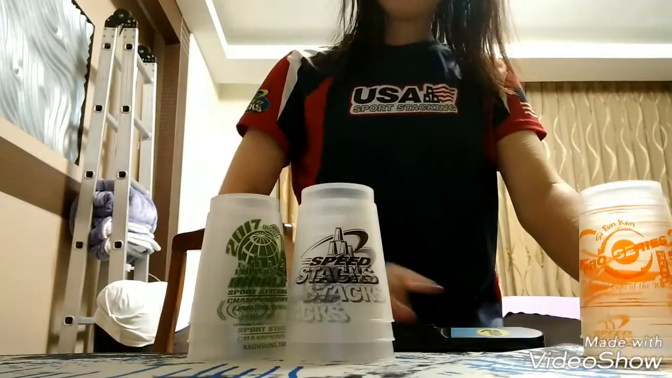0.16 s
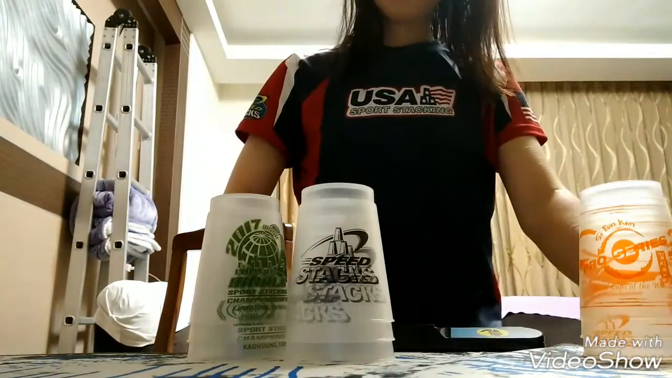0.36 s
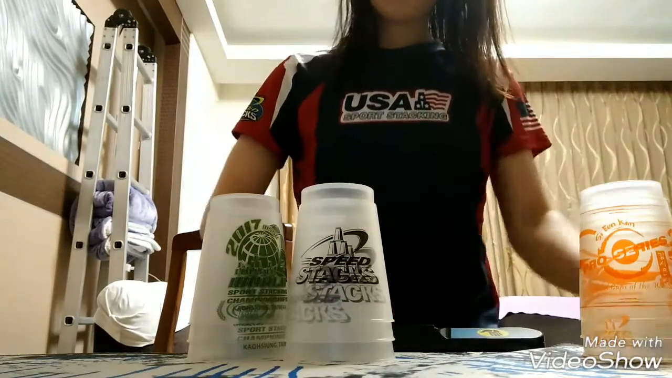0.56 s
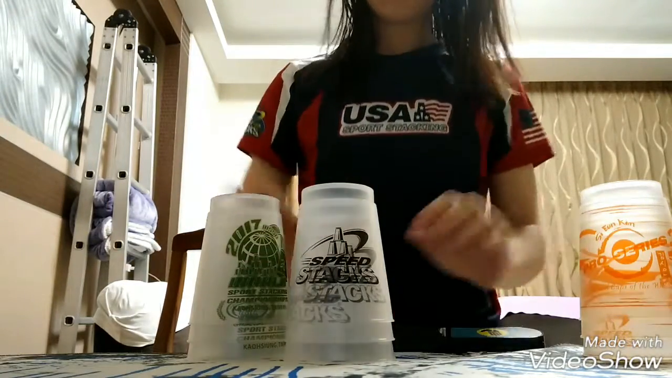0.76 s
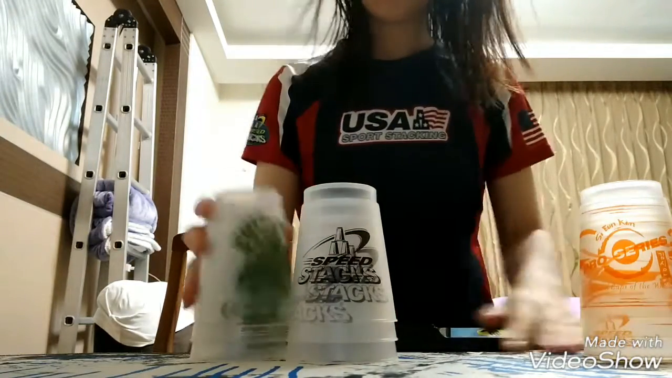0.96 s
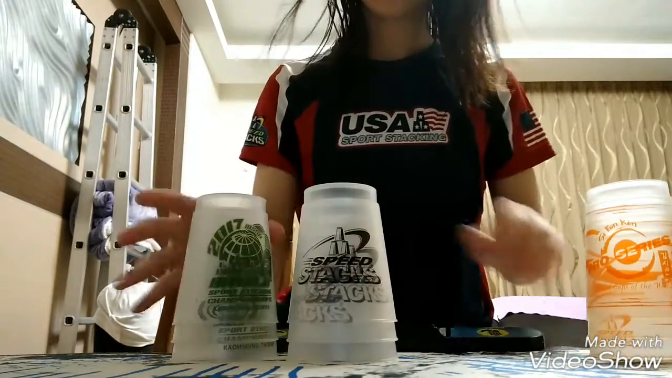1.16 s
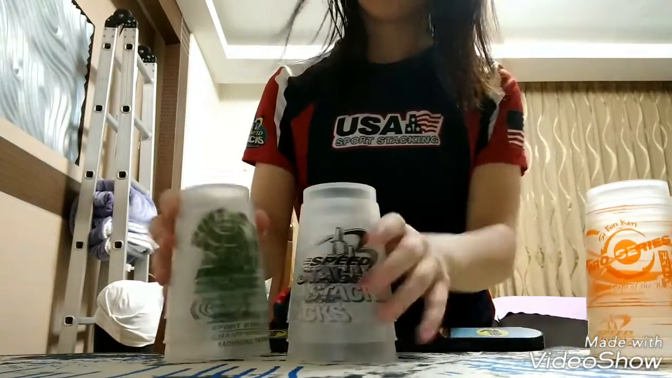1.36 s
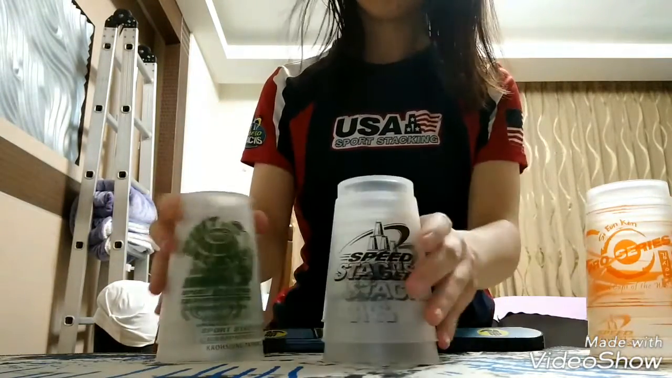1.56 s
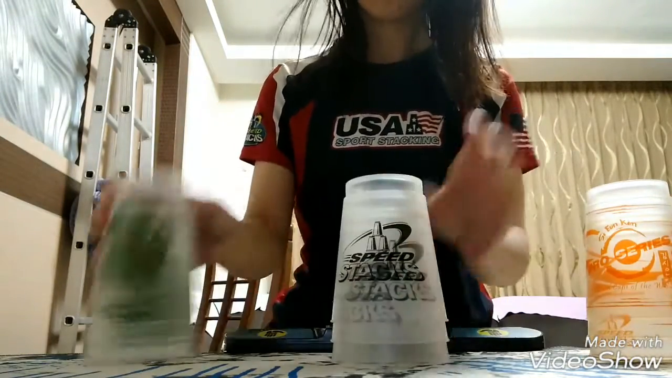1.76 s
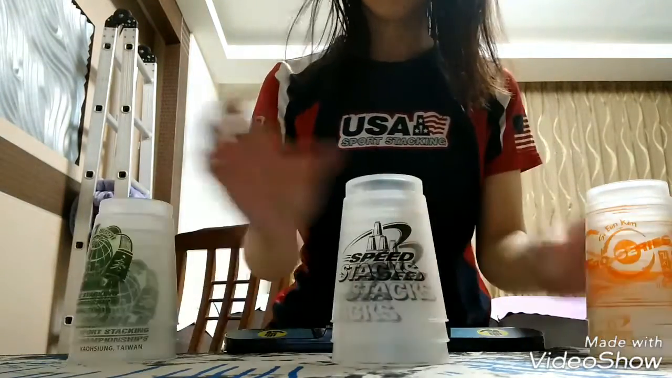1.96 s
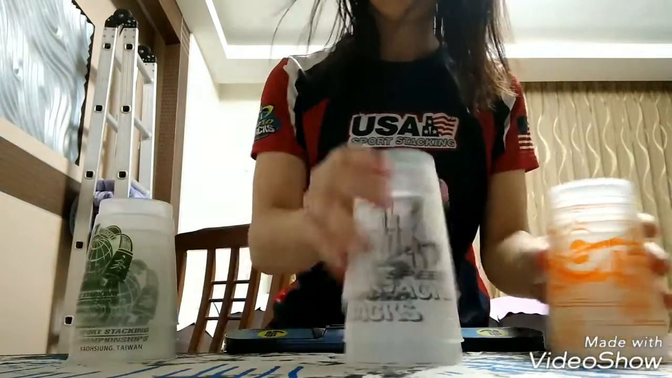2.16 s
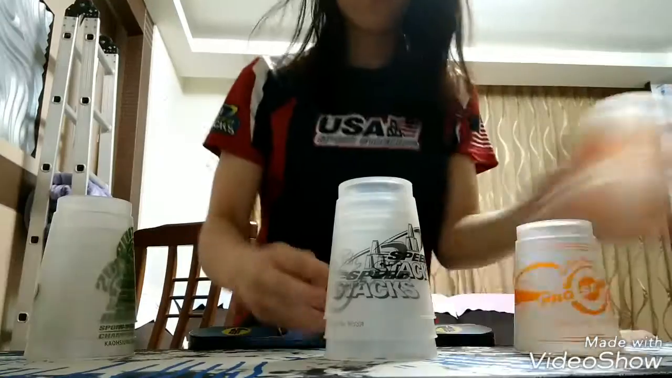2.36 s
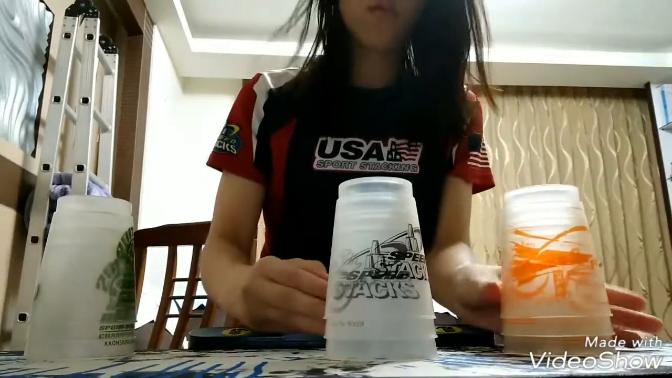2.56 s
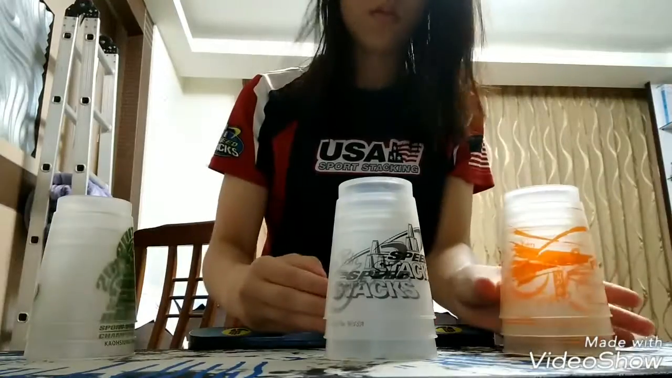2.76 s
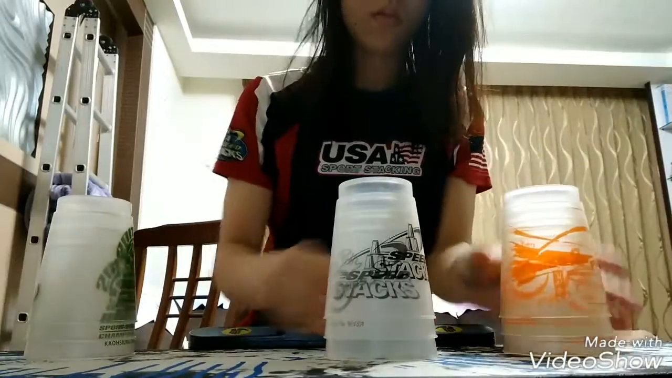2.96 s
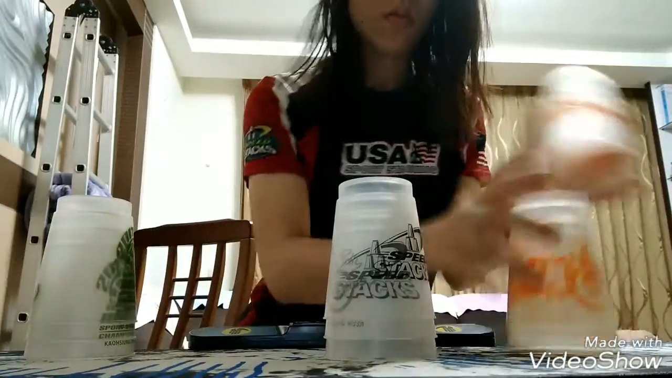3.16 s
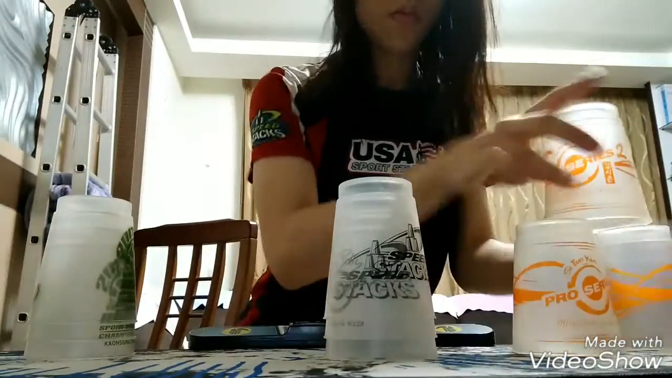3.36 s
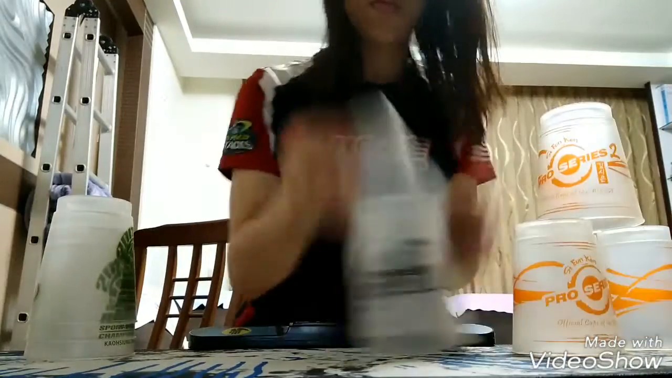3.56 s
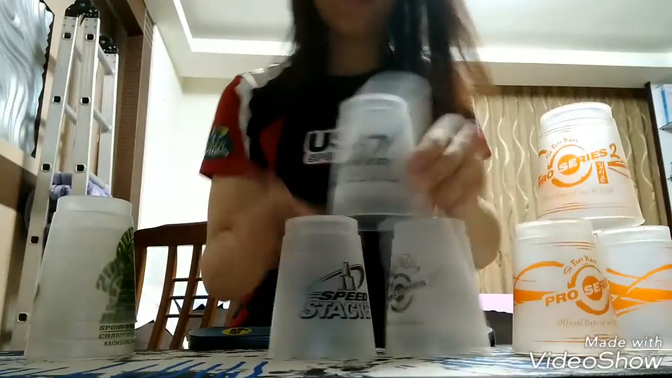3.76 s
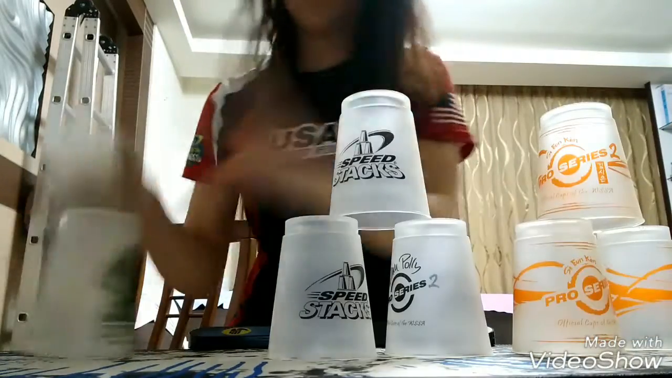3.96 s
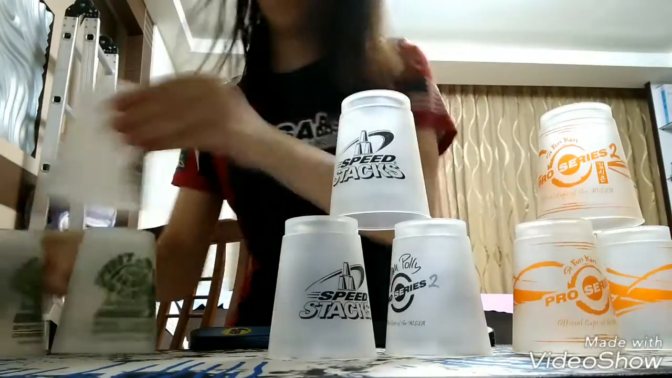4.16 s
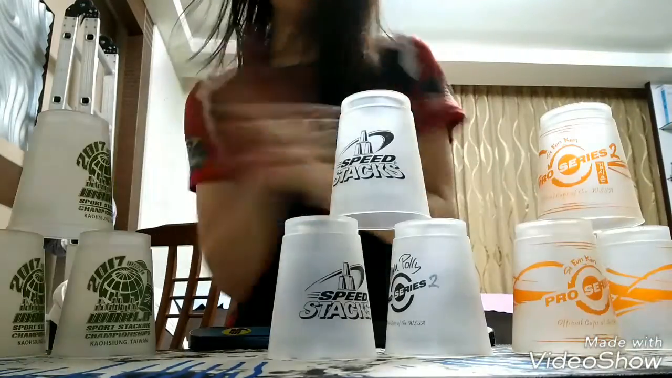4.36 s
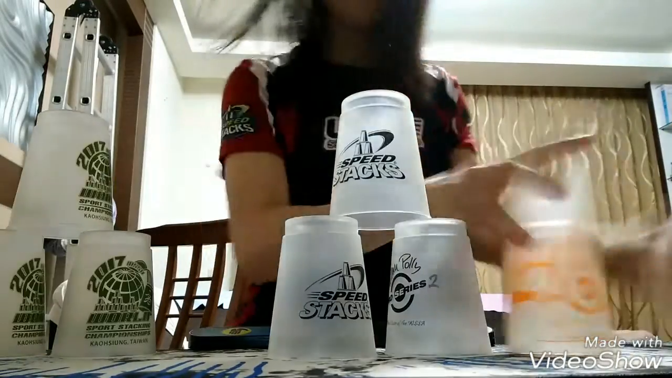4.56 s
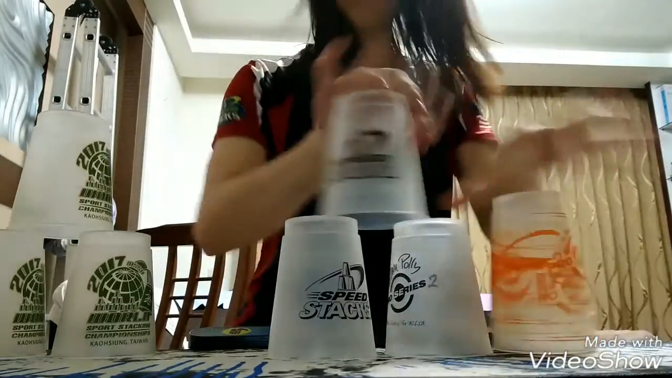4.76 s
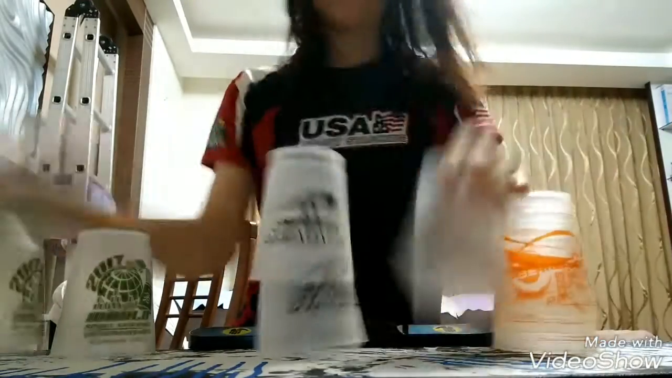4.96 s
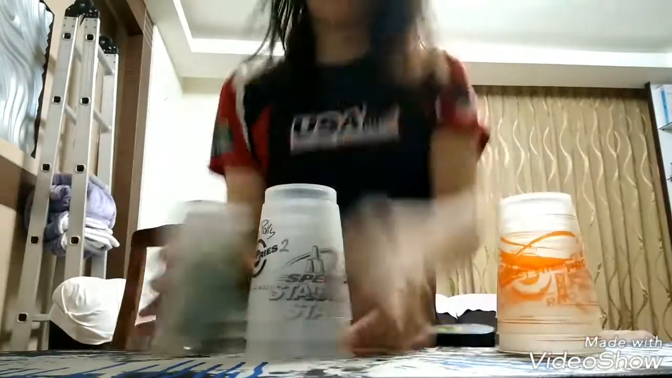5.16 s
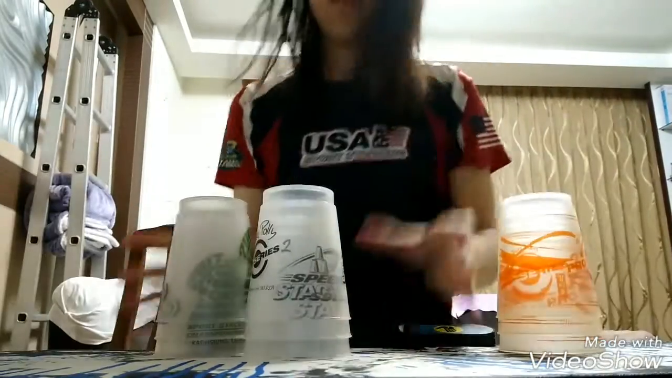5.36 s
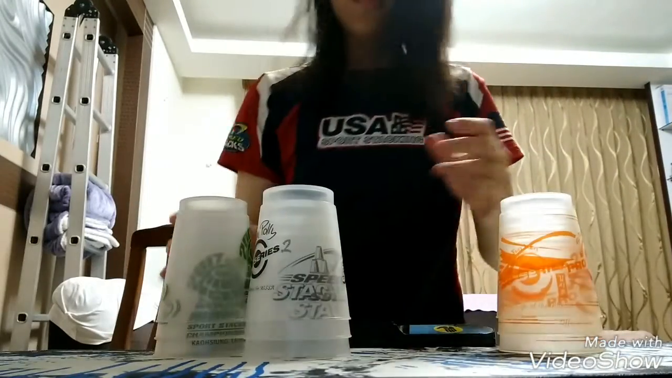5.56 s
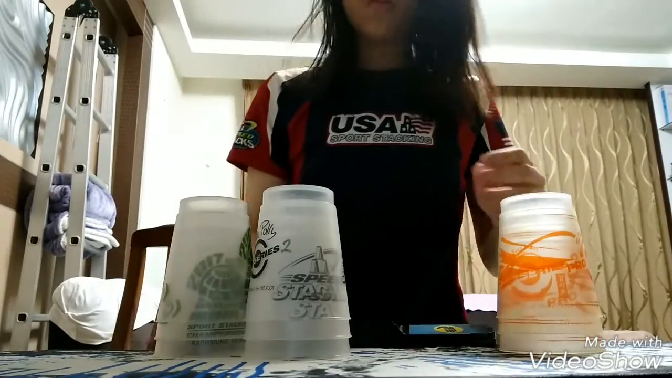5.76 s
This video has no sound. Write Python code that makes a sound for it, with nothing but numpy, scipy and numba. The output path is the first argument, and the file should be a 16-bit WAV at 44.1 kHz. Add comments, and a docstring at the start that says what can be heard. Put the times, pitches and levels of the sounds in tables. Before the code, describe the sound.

In a bare, lively room, plastic cups are handled close to a phone microphone. Faint slides and small knocks open the clip, followed by near quiet until about 0.8 s. From 1.1 to 2.2 s stacks land on a mat with soft hollow thumps, the hardest at 1.95 s. The sound drops out very briefly around 2.3 s, then a tight cluster of cup clacks and scrapes bursts out until 2.6 s. After a lull with light taps, hollow clatter returns at 3.5 s and 3.9 s, with sharp knocks around 4.4 and 4.75 s and scraping slides. The last strong clacks fall at 5.15 and 5.3 s, with thuds through the table and a short echo. Low puffs of moving air rumble mostly left over steady room noise. A faint low hum appears around 5.35 s and fades unevenly; everything sinks away before 5.9 s.

```python
"""Plastic cups are shifted, stacked into pyramids and nested again on a mat, close to a phone in a bare room.
Knocks ring cup air, walls and rim as decaying tones and filtered noise, and thud the table;
slides are stick-slip clicks through resonances. Filtered clicks and low bursts make a draught, mostly at
the left port. Noise-band echo and steady floor noise lie behind; a low tone of about 100 Hz enters late
and fades unevenly. The sound drops out once and sinks away at the end."""
import sys
import numpy as np
from scipy import signal
from scipy.fft import rfft, irfft, next_fast_len
from scipy.io import wavfile
from scipy.ndimage import uniform_filter1d, minimum_filter1d
from numba import njit

SR = 44100
rng = np.random.default_rng(int(sys.argv[2]) if len(sys.argv) > 2 else 0)


def generate_wav(signal):
    """Clip the signal to [-1, 1] and save it as 16-bit WAV at the path in sys.argv[1]."""
    frames = np.transpose(np.atleast_2d(signal))
    scaled = np.clip(frames, -1, 1) * 32767
    pcm = np.round(scaled).astype(np.int16)
    wavfile.write(sys.argv[1], SR, pcm)


def nominal_scale(level):
    """Amplitude ratio for a level in decibels (scalar or array-like)."""
    x = np.asarray(level, float) / 20
    return 10 ** x


N = 260190
T = np.arange(N) / SR
F = np.fft.rfftfreq(2 * next_fast_len(N // 2 + SR // 2, real=True), 1 / SR)

# steady room noise: (frequency [Hz], relative density [dB])
FLOOR = [(120, -34.5), (200, -16.5), (231, 5.5), (333, -6), (465, -0.5), (563, -3), (1270, -9), (1510, -13),
         (3570, -22), (9000, -79.5), (11700, -63), (19800, -120)]
FLOOR_RMS_DB = -53
# late low tone: (time [s], rms level [dB])
TONE = [(5.34, -26.5), (5.384, -41), (5.46, -34), (5.662, -40.5), (5.72, -64.5)]
TONE_HZ = 99.5
# draught rumble: (time [s], relative level [dB], nominal left minus right [dB])
DRAUGHT = [(0.0, -29.5, 12.5), (0.12, -37.5, 3.5), (0.81, -43.5, -1), (1.22, -25, 13), (1.37, -38, 19.5),
           (1.61, -27, 10.5), (1.93, -32, 8.5), (2.15, -21.5, 9.5), (2.5, -35, 8.5), (2.64, -19, 11.5),
           (3.1, -42, 14), (3.45, -28.5, 13), (3.79, -27.5, 2.5), (4.5, -37.5, 5.5), (4.69, -29, 2.5),
           (5.36, -23, -6.5), (5.4, -38, -2), (5.636, -53, 24), (5.808, -43, 21), (5.9, -55, 15)]
# strongest puffs: (time [s], envelope peak at louder port [dB], frequency [Hz], left minus right [dB])
PUFFS = [(0.947, -17, 109.3, 36), (1.018, -16, 114.8, 40.5), (1.042, -15.5, 83.4, 36),
         (1.152, -20, 87.2, 17), (1.298, -25.5, 121.9, 10.5), (1.359, -19, 105, 25.5),
         (1.493, -15, 95.6, 29), (1.516, -18.5, 94.2, 33), (1.579, -15, 101.6, 23), (1.636, -17, 109.5, 30),
         (1.676, -17.5, 96.5, 20.5), (1.72, -23, 105.8, 22), (1.821, -8, 125.4, 21),
         (1.869, -15, 113.9, 21.5), (2.017, -16.5, 92.5, 34.5), (2.06, -21, 107.5, 34.5),
         (2.39, -23, 107.4, 18.5), (2.466, -17.5, 111.9, 10.5), (2.691, -15, 114.7, 8),
         (2.794, -24.5, 111.2, 15.5), (2.857, -23, 97.6, 40.5), (2.902, -18, 97.9, 23),
         (2.966, -23.5, 103, 24.5), (3.077, -18.5, 95, 38.5), (3.155, -15, 97.7, 38),
         (3.187, -20, 116, 24.5), (3.341, -18, 88.3, 43.5), (3.423, -18, 123.3, 27),
         (3.451, -23, 105.3, 16), (3.671, -18.5, 110.3, 18), (3.801, -19, 53.7, 2),
         (3.864, -23.5, 146.8, 13), (4.223, -19.5, 125.5, 6.5), (4.603, -22.5, 126, 31),
         (4.627, -20.5, 92.9, 39), (4.68, -23, 111.8, 9.5), (4.799, -3.5, 130.9, 7.5),
         (4.831, -15.5, 102.5, 21.5), (4.978, -14.5, 141.3, 4), (5.098, -20.5, 123.3, 21.5),
         (5.132, -8, 128, 23), (5.746, -27, 116.6, 36.5), (5.813, -26, 99, 19), (5.882, -28, 114, 18.5)]
# echo bands: (centre [Hz], late t60 [s], relative level [dB])
ROOM = [(124, 0.19, 0.5), (267, 0.28, -3.5), (460, 0.51, -4.5), (1000, 0.5883, 5), (2133, 0.673, 6.5),
        (3670, 0.489, 2), (8140, 0.238, 5.5), (14200, 0.185, 6.5)]
# echo sends: (set-downs [dB], cup-on-cup knocks [dB], slides [dB])
ECHO_SEND_DB = (-3, -3.5, -2.5)
# off-axis colour of what the walls return: (frequency [Hz], gain [dB])
ECHO_COLOUR = [(1100, 0), (1350, 0.5), (1570, -5.5), (1850, 1), (2300, -1), (2750, 4.5), (3300, -1)]
# port likeness: (frequency [Hz], left-right correlation [-1..1])
ALIKE = [(100, 0.27), (300, 0.944), (650, 0.41), (1400, 0.14), (3000, 0.064), (7000, 0.12)]
# port balance of airborne sound: (frequency [Hz], left minus right [dB])
TILT = [(60, -3.5), (110, 5.5), (200, 2), (380, 0), (700, 2), (1290, 1), (2380, 5), (4400, 4), (8120, -3),
        (15000, -0.5)]
PORT_LAG_S = 0.0001884

# cups sliding: (onset peak [s], relative wall level [dB], time to fade 20 dB [s],
# rim re wall [dB], body re wall [dB])
SLIDES = [(0.0, -42, 0.1544, -19.5, 10.5), (0.078, -40.5, 0.12, -27.5, 10), (0.21, -54.5, 0.06, -40, 4),
          (1.543, -42, 0.0437, -31, 20), (1.578, -42, 0.2361, -21, 10.5), (1.782, -43.5, 0.2468, -28, 7.5),
          (2.104, -38.5, 0.2876, -32, 19.5), (2.2, -44.5, 0.38, -26, 10.5),
          (2.376, -33.5, 0.1081, -16.5, 12.5), (2.408, -18, 0.0788, -9, -9.5), (2.6, -17, 0.0715, -10, 17),
          (2.635, -23, 0.1359, -16, 5), (3.235, -45, 0.1, -8.5, -5), (3.43, -58, 0.4, -5, -15.5),
          (3.51, -28, 0.0261, 13, 23), (3.582, -41, 0.11, -17, 16), (3.7, -45.5, 0.29, -15, 13.5),
          (3.76, -41, 0.04, -12, 3), (3.794, -11, 0.0617, -18, 2.5), (3.906, -20.5, 0.0234, -8.5, 22.5),
          (4.08, -43, 0.16, -21.5, 17.5), (4.136, -33, 0, -20, -5), (4.16, -45.5, 0.46, -8, 7.5),
          (4.312, -38, 0.107, -22, 30), (4.69, -35, 0.19, -12, 10), (4.745, -26, 0.06, -13, -0.5),
          (4.784, -5.5, 0.0439, -21.5, 2), (4.865, -21.5, 0.09, -18.5, 5), (4.94, -7, 0.0089, -19.5, -6.5),
          (4.957, -21, .11, -22, 4.5), (5.15, -15, 0.0953, -8.5, 14.5), (5.185, -21.5, 0.1369, -24, 3),
          (5.3, -8, 0.0523, -22, 5), (5.366, -20.5, 0.0753, 14, 1.5), (5.395, -27.5, 0.0566, 14, 6),
          (5.43, -33.5, 0.11, 1, 2.5)]
SLIDE_RISE_S = 0.0083  # to gain 20 dB
# table-top modes: (frequency [Hz], relative level [dB], t60 [s])
TABLE = [(157.56, -7, 0.094), (238.1, -0.5, 0.056), (311.2, 6, 0.0456)]
# cup-on-cup blows reaching the table: (time [s], relative level [dB])
THUDS = [(2.39, -25), (2.41, -21.5), (2.581, -11.5), (2.592, -17.5), (2.6, -10), (2.619, -27.5),
         (3.419, -32), (3.427, -31.5), (3.476, -32), (3.505, -16.5), (3.71, -31), (3.793, -18.5),
         (3.869, -30), (3.905, -5), (3.916, -9), (3.949, -22.5), (3.96, -4), (4.306, -22), (4.339, -18),
         (4.391, -15), (4.409, -23.5), (4.664, -20.5), (4.712, -21), (4.741, -26), (4.758, -8),
         (4.784, -23), (4.877, -22.5), (5.07, -30.5), (5.103, -23.5), (5.114, -17), (5.143, -25),
         (5.163, -18), (5.316, -24.5), (5.33, -7.5)]
# stacks set down on the mat: (time [s], relative cavity level [dB], cavity pitch [Hz],
# wall re cavity [dB], table thud re cavity [dB])
SET_DOWNS = [(0.035, -40, 1000, -25, -9.5), (0.063, -39, 1000, 5.5, -15.5), (0.077, -29.5, 1250, -0.5, -18),
             (0.134, -36, 1244, 5, -19.5), (0.803, -43.5, 642, -14, -15), (1.077, -26.5, 539, 2.5, -11),
             (1.088, -25.5, 660, 0.5, -9.5), (1.128, -15.5, 637.7, -11.5, -22.5), (1.2, -27, 1110, 20, 5),
             (1.206, -11.5, 522, -15, -19), (1.221, -20.5, 581, -2, -34.5), (1.479, -25.5, 662.5, -5, -29),
             (1.54, -26, 528, -10, -16.5), (1.574, -14, 787.7, -0.5, -27.5), (1.66, -27.5, 558, -28.5, -25),
             (1.682, -34.5, 996, -9.5, -4.5), (1.72, -34.5, 676, 3, -14.5),
             (1.776, -29.5, 537, -9.5, -12.5), (1.811, -27.5, 523.2, -12.5, -9.5),
             (1.945, 2.5, 590.6, 2.5, -14), (1.957, -14.5, 520.7, -19, -1.5),
             (2.033, -17, 609.7, -23.5, -32.5), (2.048, -39.5, 950, -28, -5.5),
             (2.096, -26.5, 587, -8, -12), (2.227, -30, 587, 0, 2.5), (3.234, -28.5, 463.4, -2, -13.5),
             (3.254, -45, 1083, -13, -4)]
STACK_RIM_DB = -36.5  # re stack wall
# cup on cup: (time [s], relative cavity level [dB], cavity pitch [Hz], wall re cavity [dB], rim re cavity [dB])
KNOCKS = [(2.357, -15.5, 662, -38, -25), (2.365, -16, 633.4, -12, -21), (2.39, -11, 653.2, -9.5, -34),
          (2.402, -28, 635.5, -19, -3.5), (2.41, -9, 710.4, -34, -22), (2.421, -16.5, 764.6, -30.5, -18.5),
          (2.436, -21, 614, -4.5, -1.5), (2.442, -24.5, 625, -13.5, -20), (2.454, -23, 802, 6.5, -19.5),
          (2.574, 3, 575.2, -1.5, -18), (2.581, 11, 669.2, -9, -15), (2.592, 0.5, 602.4, -12.5, -15.5),
          (2.6, -1, 621, -18.5, -8), (2.619, 2, 556.7, 3.5, 1), (3.399, -43, 662, 9.5, -23),
          (3.419, -28, 443.4, -35, -46), (3.427, -29, 584, -17.5, -15), (3.438, -23.5, 444.5, -8.5, -38),
          (3.458, -26, 440.7, -12, -38.5), (3.476, -35, 414.6, 0, -30), (3.492, -18, 577.5, -13, -30),
          (3.505, 8.5, 735.5, -9, -32.5), (3.515, 6.5, 695, -32, -17.5), (3.641, -9, 634.8, -19, -45.5),
          (3.71, -21.5, 450, -5, -34.5), (3.749, -25, 738, 2.5, -16.5), (3.793, -7.5, 497.3, 5.5, -6.5),
          (3.869, -13.5, 684, -10.5, -29), (3.905, 9.5, 705.3, -12, -38), (3.916, 7.5, 638, -23, -38.5),
          (3.949, 4, 985, -4.5, -7.5), (3.96, 11.5, 637.4, -26.5, -14.5), (3.995, -21, 557.5, -20.5, -21.5),
          (4.107, -27.5, 797, -11, -26), (4.138, -36, 644, 10, -21), (4.204, -27, 621, -22, -24),
          (4.223, -28.5, 688.3, -9, -26), (4.306, -2, 950, -9, -40), (4.339, -4.5, 1029, -36.5, -40.5),
          (4.391, 10.5, 663.6, -12.5, -14), (4.409, 1.5, 729.7, -29, -39.5),
          (4.467, -11.5, 726, -16.5, -54.5), (4.499, -16, 739, -17, -30.5),
          (4.664, -10.5, 701.2, -11.5, -43.5), (4.704, -12.5, 731.7, -19, -32),
          (4.712, -12, 621, -11, -29.5), (4.741, -15.5, 517, -29.5, -10.5), (4.758, 9.5, 618, -4.5, -23),
          (4.774, -4.5, 740.5, 15, 4), (4.784, -5.5, 540.2, -1.5, -16.5), (4.867, -22, 531.2, -2.5, -9.5),
          (4.877, -11.5, 1139, -2, -8), (4.938, -18, 819, 11.5, -4), (5, -8.5, 592.3, -15, -32),
          (5.07, -21, 619, -7.5, -10), (5.103, -11, 529, -3.5, -34), (5.114, -18, 614, -2.5, -26.5),
          (5.143, 13, 612.7, -15, -21), (5.163, 15.5, 651.7, -5.5, -8), (5.175, 6, 889.4, -17, -3.5),
          (5.193, 5.5, 1011, 4, -0.5), (5.254, -11.5, 661.5, -5.5, -19.5), (5.297, -23, 601, -10, -12.5),
          (5.316, 10, 609.8, -1, -22), (5.33, 0.5, 548, -1, 6.5)]
# cup air modes: (multiple of cavity pitch [ratio], relative level [dB], t60 [s])
CAVITY = [(1, 3, 0.0254), (1.2, -4, 0.021), (1.56, -4.5, 0.0205)]
CHATTER_S = 0.002602  # decay time constant
# wall of a nested stack: (centre [Hz], nominal width [Hz], relative level [dB])
STACK_WALL = [(1000, 730, -2.5), (1581, 293, 6), (2172, 443, -6), (2859, 738, -9.5), (3890, 390, -16.5)]
# wall of a cup: (centre [Hz], nominal width [Hz], relative level [dB])
WALL = [(1250, 421, 2.5), (1901, 784, 4), (2937, 470, -15), (3412, 1218, 1.5), (4150.5, 682, -5)]
# rim of a cup: (centre [Hz], nominal width [Hz], relative level [dB])
RIM = [(4902, 2416, 19), (6227, 1186, 8), (7180, 4200, -1.5)]
# body of a sliding cup: (centre [Hz], nominal width [Hz], relative level [dB])
BODY = [(305.6, 61, 3.5), (682.4, 415, 5), (950, 490, -2)]

# airborne sound dips after the last knock, then fades out: (time [s], gain [dB])
SINK = [(5.334, 1), (5.340, -22), (5.36, -15), (5.368, -12.5), (5.6, -5.5), (5.78, -3.5), (5.87, -22)]
# brief loss of level: (time [s], gain [dB])
DROPOUT = [(2.298, -1), (2.312, -37.5), (2.335, -51.5), (2.343, -17.5), (2.354, -14), (2.357, 1.5)]
# microphone response: (frequency [Hz], gain [dB])
MICROPHONE = [(20, 4.5), (60, 0), (6000, 1.5), (8000, -2), (10500, -11), (13000, -6.5), (16000, 0.5)]
CEILING, RELEASE_S = 0.8, 0.03
SPLIT_HZ, TREBLE_LAG_S = 4650, 0.0047


def shape(x, gain):
    """Multiply the spectrum by a gain over F."""
    size = 2 * len(F) - 2
    return irfft(rfft(x, size) * gain, size)[..., :N]


def on_log(table):
    """Read a (frequency [Hz], value) table at every F, on a log axis."""
    hz, value = np.transpose(table)
    return np.interp(np.log(F + 1), np.log(hz), value)


def unit(x):
    """Scale to rms 1."""
    return x / np.sqrt(np.mean(x ** 2))


def pair(x):
    """Mix two unrelated rows into left and right, as alike as the ports are at each frequency."""
    alike = np.clip(on_log(ALIKE), -.99, .99)
    mid = shape(x[0], np.sqrt((1 + alike) / 2))
    side = shape(x[1], np.sqrt((1 - alike) / 2))
    return np.array([mid + side, mid - side])


def resonances(x, peaks):
    """Sum of resonances with steep skirts: each a squared second-order response."""
    gain = 0
    for hz, width_hz, db in peaks:
        detuning = (F ** 2 - hz ** 2) / (0.8317 * width_hz * F + 1e-9)
        gain = gain + nominal_scale(db) / (1 + 1j * detuning) ** 2
    return shape(x, gain)


def rung(x, peaks):
    """Resonances normalised by their summed power times nominal width."""
    power = sum(nominal_scale(2 * db) * width_hz for _, width_hz, db in peaks) / SR * np.pi
    return resonances(x, peaks) / np.sqrt(power)


def ring(modes, t, turn_rad):
    """Exponentially decaying modes at both ports, the left leading by turn_rad."""
    hz, db, t60_s = np.array(modes, float).T[:, :, None]
    lead = turn_rad * np.array([.5, -.5])[:, None, None]
    decay = np.exp(-np.log(1000) * t / t60_s)
    return np.sum(nominal_scale(db) * decay * np.sin(2 * np.pi * hz * t + lead), axis=1)


def room_floor():
    """Steady background: spectrally shaped noise, partly shared by the ports."""
    noise = pair(rng.standard_normal((2, N)))
    return nominal_scale(FLOOR_RMS_DB) * unit(shape(noise, nominal_scale(on_log(FLOOR))))


def late_tone():
    """One low sine, alike at both ports, that enters late and fades unevenly."""
    s, db = np.transpose(TONE)
    gate = np.interp(T, [s[0] - .01, s[0], s[-1], s[-1] + 0.012], [0, 1, 1, 0])
    return np.sqrt(2) * nominal_scale(np.interp(T, s, db)) * gate * np.sin(2 * np.pi * TONE_HZ * T)


def draught():
    """Eddies at each port: random clicks and noise ring low resonances; strong puffs are short low bursts."""
    s, db, pan_db = np.transpose(DRAUGHT)
    clicks = rng.random((2, N)) < 80 / SR  # 80 per second
    eddies = clicks * nominal_scale(2.0 * rng.exponential(size=(2, N))) * rng.choice([-1, 1], (2, N))
    push = eddies + 0.0219 * rng.standard_normal((2, N))
    air = resonances(push, [(95, 108.3, 38.5), (42, 28, -10.5), (220, 360, -16.5)])
    air = air + 0.23 * air[::-1]  # ports share little
    balance_db = np.array([[.5], [-.5]]) * np.interp(T, s, pan_db)
    out = unit(air) * nominal_scale(np.interp(T, s, db) - 6 + balance_db)
    for s, db, hz, pan_db in PUFFS:
        near = slice(int(s * SR) - 1024, int(s * SR) + 1024)
        t = T[near] - s
        ports = nominal_scale(db + np.minimum([[pan_db], [-pan_db]], 0))
        out[:, near] += ports * np.exp(-(t * hz / 0.559) ** 2) * np.cos(2 * np.pi * hz * t + .5)
    return out


def room(x):
    """Echo tail of the bare room: broad noise bands, each dying at its own pace."""
    # table top and near walls answer first and briefly
    near = nominal_scale(9.0) * np.exp(-np.log(1000) * T / 0.1302)
    tail = 0
    for hz, t60_s, db in ROOM:
        octaves = np.log2((F + 1) / hz)
        band = shape(pair(rng.standard_normal((2, N))), np.exp(-(octaves / 1.069) ** 2))
        decay = np.exp(-np.log(1000) * T / t60_s) + near
        tail = tail + nominal_scale(db) * band * decay / np.sqrt(t60_s)
    tail = tail * np.clip((T - .004) / 0.00379, 0, 1) * (T < .9)
    tail = tail / np.sqrt(np.sum(tail[0] ** 2))
    response = rfft(tail, 2 * len(F) - 2) * nominal_scale(on_log(ECHO_COLOUR))
    return shape(x.mean(axis=0), response)


def slides():
    """Stick-slip clicks of uneven size ring wall, rim and body of the sliding cup."""
    level = np.zeros((3, N))
    for s, db, fade_s, rim_db, body_db in SLIDES:
        near = slice(max(int(s * SR) - 2048, 0), int(s * SR) + SR // 2)
        t = T[near] - s
        swell = nominal_scale(db - 20 * np.where(t < 0, -t / SLIDE_RISE_S, t / fade_s))  # bites fast, then slows
        level[:, near] += nominal_scale(np.array([[0], [rim_db], [body_db]])) * swell
    clicks = rng.random((2, N)) < 3500 / SR  # 3500 per second
    sizes = nominal_scale(1.91 * rng.exponential(size=(2, N))) * rng.standard_normal((2, N))
    slips = unit(pair(clicks * sizes))
    parts = (WALL, RIM + [(11500, 6000, -17.5)], BODY)
    return nominal_scale(-4.5) * sum(rung(gain * slips, peaks) for gain, peaks in zip(level, parts))


def thuds(blows):
    """The table top's low modes ring briefly under each blow."""
    out, t = np.zeros((2, N + 4096)), np.arange(4096) / SR
    thud = ring(TABLE, t, 0.093) * (1 - np.exp(-t / 0.00075))
    for s, db in blows:
        i = int(s * SR)
        out[:, i:i + 4096] += nominal_scale(db) * thud
    return out[:, :N]


def knocks(blows, wall, strike_db):
    """The air in the cup rings on; a short chatter of the contact shakes walls and rim."""
    tones, chatter, t = np.zeros((2, N + 4096)), np.zeros((2, N + 4096)), np.arange(4096) / SR
    for s, db, hz, wall_db, rim_db in blows:
        cavity = ring(np.array(CAVITY) * [hz, 1, 1], t, 0.13)
        i = int(s * SR)
        tones[:, i:i + 4096] += nominal_scale(db) * cavity * (1 - np.exp(-t / 0.000686))
        parts = nominal_scale(db + np.array([[wall_db], [rim_db]]))
        chatter[:, i:i + 4096] += parts * np.exp(-t / CHATTER_S)
    shake = pair(rng.standard_normal((2, N)))
    contacts = (np.array(blows)[:, 0] * SR).astype(int)
    shake[:, contacts] = nominal_scale(strike_db)  # first contact is one sharp push
    return tones[:, :N] + rung(chatter[0, :N] * shake, wall) + rung(chatter[1, :N] * shake, RIM)


def set_downs():
    """A stack lands on the mat and thuds the table; its nested rims are damped alike each time."""
    s, db, hz, wall_db, thud_db = np.transpose(SET_DOWNS)
    blows = np.c_[s, db, hz, wall_db, wall_db + STACK_RIM_DB]
    return knocks(blows, STACK_WALL, strike_db=20) + thuds(np.c_[s, db + thud_db])


def cup_on_cup():
    """Cup meets cup; some blows carry through to the table."""
    return knocks(KNOCKS, WALL, strike_db=11.0) + thuds(THUDS)


def scene():
    """Cups, their echo and the room's floor, with the draught and the late low tone added."""
    cups = np.array([set_downs(), cup_on_cup(), slides()])
    echo = room(np.tensordot(nominal_scale(np.array(ECHO_SEND_DB)), cups, axes=1))
    ports = np.array([[.5], [-.5]])
    # knocks, slides and echo reach the left port first; set-downs are straight ahead
    aside = shape(cups[1] + cups[2] + echo, np.exp(2j * np.pi * F * PORT_LAG_S * ports))
    air = (cups[0] + aside + room_floor()) * nominal_scale(np.interp(T, *np.transpose(SINK)))
    air = shape(air, nominal_scale(on_log(TILT) * ports))
    return air + draught() + late_tone()


@njit
def follow(x, fall):
    """Peak follower: jumps up at once, is multiplied by fall each sample."""
    out, e = np.empty(len(x)), 0.
    for i in range(len(x)):
        e = max(x[i], e * fall)
        out[i] = e
    return out


def limit(x):
    """Gain drops just ahead of any peak over the ceiling and recovers soon after."""
    peak = -minimum_filter1d(-np.abs(x).max(axis=0), size=23)
    held = follow(peak, np.exp(-1 / (RELEASE_S * SR)))
    gain = CEILING / np.maximum(held, CEILING)
    return x * uniform_filter1d(gain, size=11)


def low_pass(x):
    """Removes everything above the highest recorded frequency."""
    return signal.sosfilt(signal.butter(12, 16440, fs=SR, output="sos"), x)


def record(dry):
    """The phone drops out once, limits peaks, and passes treble dulled and a little late."""
    dry = dry * nominal_scale(np.interp(T, *np.transpose(DROPOUT)))
    high = np.clip((F - SPLIT_HZ) / 150 + .5, 0, 1)
    late = 1 - high + high * np.exp(-2j * np.pi * F * TREBLE_LAG_S)
    mix = shape(limit(dry), late * nominal_scale(on_log(MICROPHONE)))
    return low_pass(mix)


dry = scene()
out = record(dry)
generate_wav(out)
```